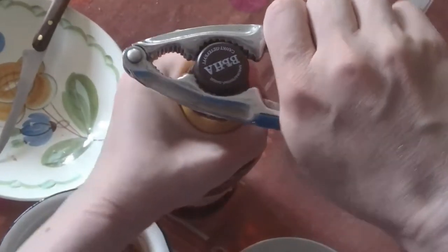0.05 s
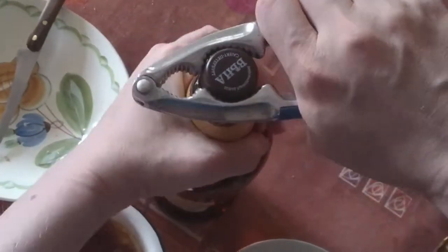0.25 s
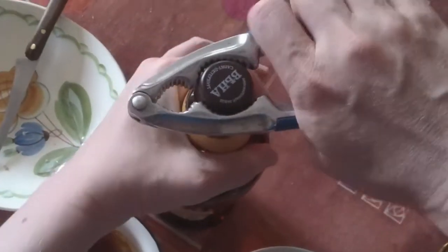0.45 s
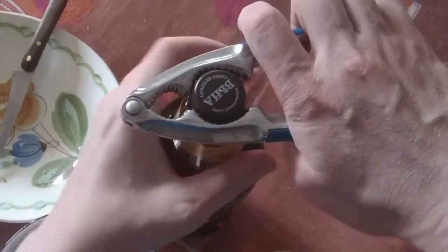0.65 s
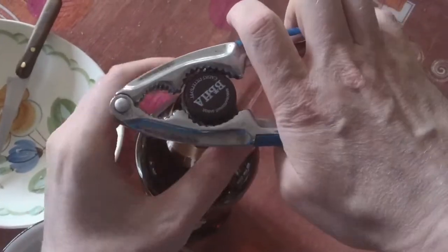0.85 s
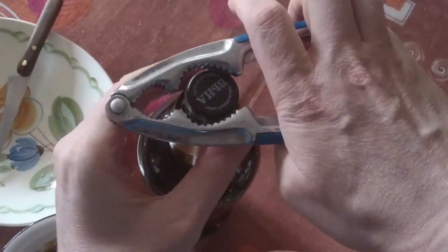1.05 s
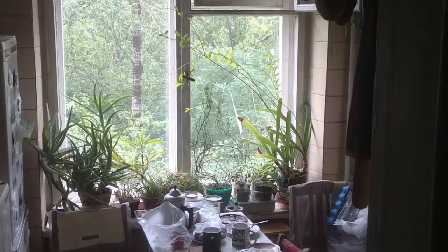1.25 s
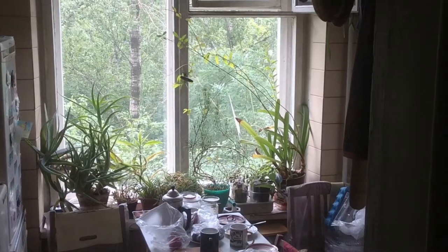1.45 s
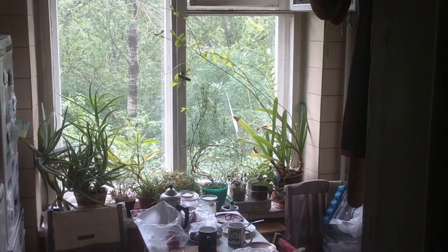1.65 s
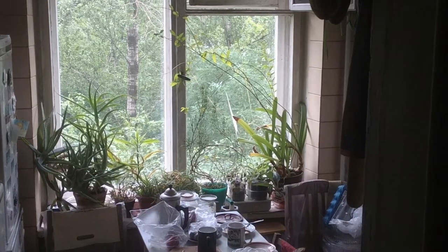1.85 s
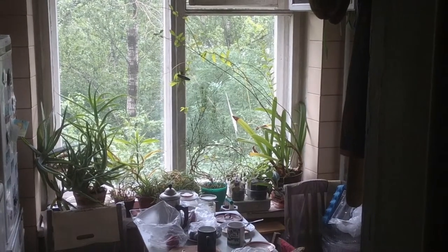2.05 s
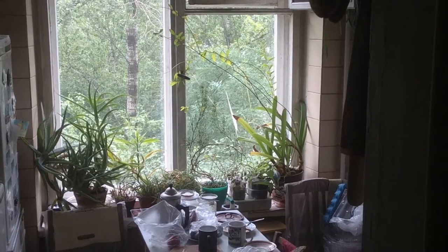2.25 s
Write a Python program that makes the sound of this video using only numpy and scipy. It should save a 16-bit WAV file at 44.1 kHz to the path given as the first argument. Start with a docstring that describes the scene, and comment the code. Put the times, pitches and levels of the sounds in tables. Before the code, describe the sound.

A steel tool clicks once on a bottle cap, with faint ticks and quiet hiss.

```python
"""Steady hiss, low room noise and faint ticks, probably a lens's focus drive, sound in a small kitchen.
A steel gripping tool bites on a bottle cap: its teeth shift with tiny scrapes, then slip with one sharp
click, as impulses excite the modes of cap, jaws and arms and the room reverberates briefly.
After a moment of silence the scene moves from the table to the window: thinner ticks, the same quiet."""
import sys
import numpy as np
from scipy import signal
from scipy.fft import rfft, irfft
from scipy.io import wavfile

SR = 44100
rng = np.random.default_rng(int(sys.argv[2]) if len(sys.argv) > 2 else 0)


def unload_audio(sound):
    """Save the sound as a 16-bit wav file, at the path given as the first command line argument."""
    columns = np.transpose(np.atleast_2d(sound))
    # keep every value between -1 and 1, then stretch to whole-number steps
    steps = np.round(np.clip(columns, -1, 1) * 32767)
    wavfile.write(sys.argv[1], SR, steps.astype(np.int16))


N = 105840

# Slips of the jaws on the cap: t/s, level/dB, high-pass corner f/Hz
JAW_SLIPS = [(.2302, -9, 5560), (.2309, -20.5, 5000), (.23255, -2, 2380), (.23322, -16, 970)]
PAUSE_START_S, PAUSE_END_S = 1.092, 1.155  # silence between table and window


def from_db(db):
    """Amplitude ratio: a factor of ten for every 20 dB."""
    return 10 ** (np.asarray(db) / 20)


def rms_one(x):
    """Normalisation to unit mean power."""
    return x / np.sqrt(np.mean(x ** 2) + 1e-20)


def seconds():
    """Uniform sampling: t/s of every sample."""
    return np.arange(N) / SR


def impulses(times, levels_db):
    """Ideal impacts: one sample each, hence a flat spectrum."""
    out = np.zeros(N)
    samples = np.round(np.asarray(times) * SR).astype(int)
    np.add.at(out, np.clip(samples, 0, N - 1), from_db(levels_db))
    return out


def ring(force, modes):
    """Modal superposition: each mode is a damped oscillator, opposite in sign to its neighbours."""
    out = np.zeros(N)
    for k, (hz, db, t60) in enumerate(modes):
        radius, angle = from_db(-60 / (t60 * SR)), 2 * np.pi * hz / SR
        feedback = [2, -4 * radius * np.cos(angle), 2 * radius ** 2]
        out += (-1) ** k * from_db(db) * signal.lfilter([1, 0, -1], feedback, force + 1e-18)
    return out


def noise(spectrum):
    """Spectral shaping: white noise takes the given colour, at unit rms."""
    hz, db = np.transpose(spectrum)
    bins_hz = np.maximum(np.arange(N // 2 + 1) * SR / N, 1)
    gain = from_db(np.interp(np.log(bins_hz), np.log(hz), db)) * (bins_hz > 10)
    return rms_one(irfft(rfft(rng.standard_normal(N)) * gain, N))


def slip_decay(t60_s, delay_s=0):
    """Incoherent addition: each slip's exponential decay, relative to the strongest, adds in power."""
    top_db = max(db for _, db, _ in JAW_SLIPS)
    power = 0
    for start, db, _ in JAW_SLIPS:
        age = seconds() - start - delay_s
        decay_db = 60 * np.clip(age / t60_s, 0, 3)
        power += (age > 0) * from_db(db - top_db - decay_db) ** 2
    return np.sqrt(power)


def background():
    """Stationary broadband noise in each place; at the window a faint pure tone joins it."""
    # Room noise and hiss at the table and at the window: f/Hz, relative spectral level/dB
    table_air = [(20, 4), (40, 1.5), (100, -4), (250, -10.5), (525, -16), (1100, -20.5), (2000, -23.5),
                 (3400, -25), (4800, -26.5), (8000, -27.5), (11000, -29), (15000, -31.5)]
    window_air = [(20, 3), (43, -0.5), (80, -4.5), (180, -9.5), (300, -11.5), (500, -17.5), (1100, -21),
                  (1900, -25.5), (2700, -25.5), (3400, -24.5), (4300, -28.5), (5600, -26.5), (8000, -28.5),
                  (11500, -32), (15000, -32.5)]
    table = from_db(-48.5) * noise(table_air)
    window = from_db(-47.5) * noise(window_air)
    whine = from_db(-73) * np.sqrt(2) * np.sin(2 * np.pi * 1129 * seconds())
    return np.where(seconds() < PAUSE_START_S, table, window + whine)


def focus_ticks():
    """Impact excitation: each move of the drive is five rebounding steps and a tap as the lens settles."""
    # Moves of the drive: centre t/s, tick level/dB, low knock level/dB
    moves = [(0.1054, -36, -37.5), (.1945, -37.5, -50), (0.3572, -35, -37), (0.4806, -37.5, -40.5),
             (.4995, -35, -43.5), (.532, -34.5, -43.5), (0.6804, -37.5, -41.5), (.74, -35.5, -41),
             (0.7811, -37, -45), (0.8326, -37.5, -54), (0.956, -36, -37), (1.0314, -37.5, -41.5),
             (1.0748, -37, -42.5), (1.167, -42.5, -57), (1.289, -40.5, -61), (1.3016, -44, -62),
             (1.3172, -41, -65), (1.4422, -39, -62), (1.5566, -40.5, -62), (1.583, -41.5, -65),
             (1.595, -43.5, -65), (1.7078, -38.5, -65), (1.8315, -39.5, -67), (1.8534, -39.5, -67),
             (1.8858, -39.5, -65), (2.0052, -40, -65), (2.0534, -40.5, -67), (2.075, -41.5, -65),
             (2.135, -42.5, -62), (2.2554, -39.5, -65), (2.303, -41, -65), (2.3196, -42, -65)]
    # Modes of the drive focused near, focused far, and of its knock: f/Hz, level/dB, T60/s
    near_modes = [(5800, 0.5, 0.0016), (7500, -1, 0.0019), (8300, -3.5, 0.0023)]
    far_modes = [(6030, -1.5, 0.0021), (8900, -4.5, 0.0019), (10200, -4.5, 0.0017)]
    knock_modes = [(1290, -12.5, 0.0075), (1700, -7, 0.0053), (3150, 1.5, 0.0019), (4360, -4, 0.0041)]
    step_s, jitter_s, rebound_s, rebound_db = .0023, .00015, .00064, 1.5
    centre, tick_db, knock_db = np.transpose(moves)[:, :, None]
    step = np.arange(-2, 3)
    times = centre + step * step_s + jitter_s * rng.standard_normal((len(centre), len(step)))
    taper_db = -14.5 * (step / 2) ** 2  # the middle step is strongest
    half_gap = rebound_s * rng.uniform(.9, 1.1, times.shape) / 2
    push, knock = (impulses(times - half_gap, db) + impulses(times + half_gap, db + rebound_db)
                   for db in (tick_db + taper_db, knock_db + taper_db))
    settle_s = .0065 + .001 * rng.standard_normal(centre.shape)
    push += impulses(centre + settle_s, tick_db - 3.5)
    near = seconds() < PAUSE_START_S
    low_pass = signal.butter(8, 8600, fs=SR, output="sos")
    body = signal.sosfilt(low_pass, ring(push * near, near_modes) + ring(knock, knock_modes))
    bright_edge = from_db(-2) * np.diff(push * near, prepend=0)
    return body + bright_edge + ring(push * ~near, far_modes)


def scrapes():
    """Friction noise: a narrow band plus broadband grit, with sudden onset and Gaussian decay."""
    # Scrapes of teeth on the cap and of handling: t/s, level/dB, f/Hz, decay time/s, relative grit/dB
    shifts = [(0.0141, -36, 6360, 0.0019, -3.5), (0.0217, -45, 6640, 0.0017, -9),
              (0.1197, -46, 7300, 0.0027, 1), (0.1822, -47, 6450, 0.0024, 5),
              (0.1883, -38, 5340, .0028, -9), (1.079, -48.5, 12000, 0.0013, 4),
              (1.1775, -49, 11700, 0.0018, 0), (1.182, -53, 11000, 0.0027, -1)]
    bandwidth_hz = 420
    out = np.zeros(N)
    for start, db, hz, decay_s, grit_db in shifts:
        grit = rng.standard_normal(N)
        band = rms_one(signal.lfilter(*signal.iirpeak(hz, hz / bandwidth_hz, fs=SR), grit))
        age = np.maximum(seconds() - start, 0) / decay_s
        envelope = (age > 0) * np.exp(-np.minimum(age ** 2, 20))
        out += from_db(db) * (band + from_db(grit_db) * grit) * envelope
    return out


def kitchen_reverb():
    """Diffuse field: dense reflections of the click merge into exponentially decaying noise."""
    # Spectrum of the reflections: f/Hz, relative level/dB
    room_colour = [(300, -17), (800, -11), (1300, -10), (2100, 1), (2700, -4.5), (3450, 2), (4400, -5),
                   (5400, -0.5), (6400, -5), (7600, -1.5), (8800, -9), (10000, -6.5), (12000, -19),
                   (15000, -20)]
    return from_db(-37) * noise(room_colour) * slip_decay(t60_s=.23, delay_s=.001)


def cap_click():
    """Stick-slip excitation: the hand damps the cap at once, while the steel arms ring a little longer."""
    # Modes of cap and jaws: f/Hz, level/dB, T60/s
    cap_modes = [(818, -26, 0.027), (2086, -19.5, .018), (2690, -38, 0.011), (3512, -0.5, 0.0064),
                 (3890, -1.5, .0025), (5120, -6.5, 0.0056), (7130, -15, .007), (7650, -18.5, 0.01),
                 (9780, -32.5, 0.011)]
    # Modes of the arms: f/Hz, level/dB
    arm_modes = [(3450, -45), (4862, -55.5), (5252, -40.5), (5564, -51), (6686, -57.5), (6961, -42),
                 (9845, -55)]
    # Dry crack of steel skidding on the cap: f/Hz, relative level/dB
    crack_colour = [(500, -7), (1500, -4), (3000, -2), (6000, -1.5), (9000, -7), (12500, -14), (15000, -6)]
    arm_t60_s = .13
    force = np.zeros(N)
    for start, db, corner_hz in JAW_SLIPS:
        high_pass = signal.butter(2, corner_hz, "high", fs=SR, output="sos")
        force += signal.sosfilt(high_pass, impulses([start], [db]))
    arms = ring(force, [(hz, db, arm_t60_s) for hz, db in arm_modes])
    crack = from_db(-26.5) * noise(crack_colour) * slip_decay(t60_s=.019)
    return ring(force, cap_modes) + arms + crack


def scene():
    """Linear superposition of all sources, the same in both ears."""
    mono = cap_click() + kitchen_reverb() + scrapes() + focus_ticks() + background()
    return np.array([mono, mono])


def record(dry):
    """Gating and band limiting: linear fades frame the pause, and a low-pass cuts the highest treble."""
    fade_s, cutoff_hz = .0078, 15300
    t = seconds()
    gate = np.clip(np.maximum(PAUSE_START_S - t, t - PAUSE_END_S) / fade_s, 0, 1)
    low_pass = signal.firwin(601, cutoff_hz, fs=SR, window=("kaiser", 8))
    return signal.fftconvolve(dry * gate, low_pass[None], mode="same", axes=1)


dry = scene()
out = record(dry)
unload_audio(out)
```